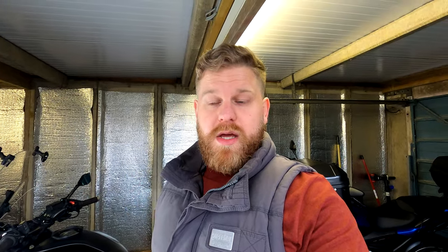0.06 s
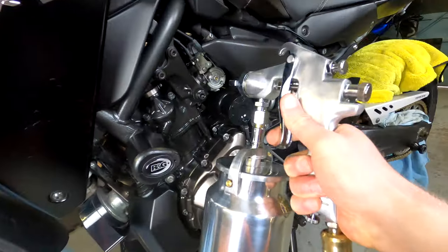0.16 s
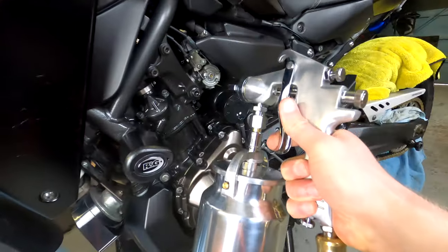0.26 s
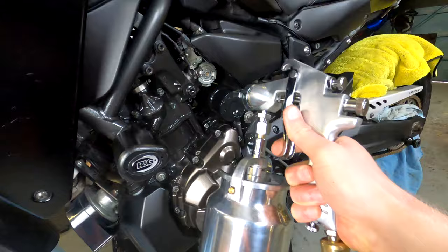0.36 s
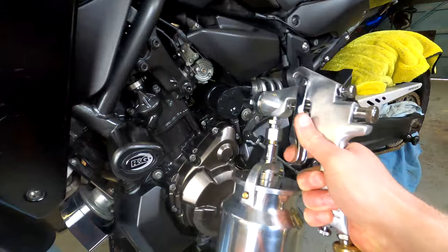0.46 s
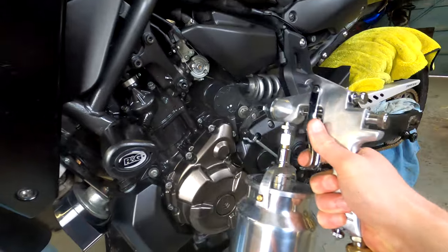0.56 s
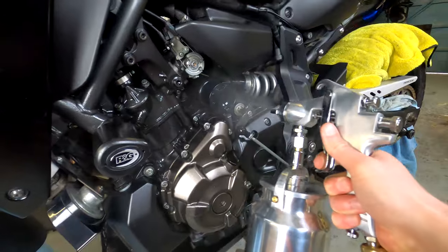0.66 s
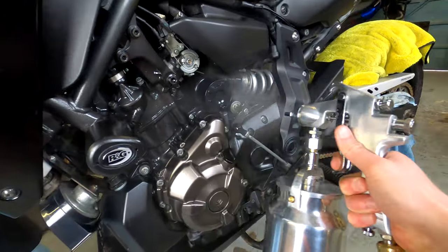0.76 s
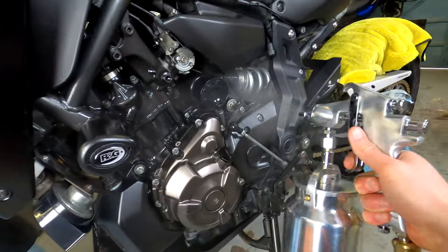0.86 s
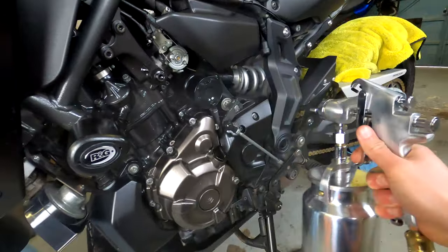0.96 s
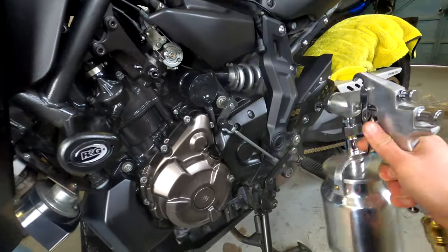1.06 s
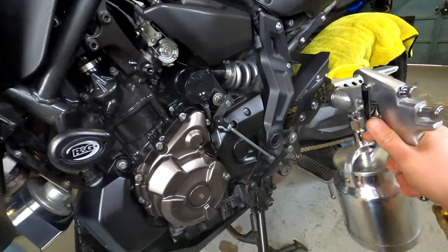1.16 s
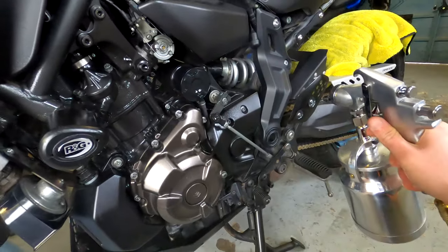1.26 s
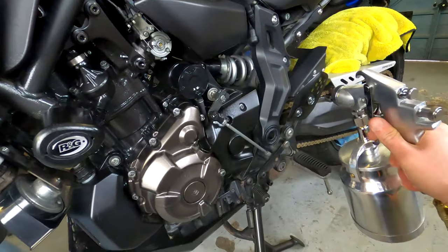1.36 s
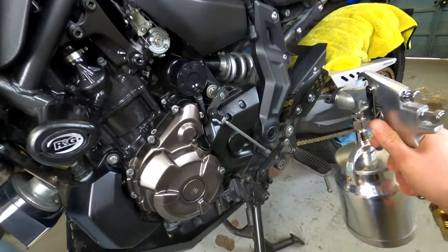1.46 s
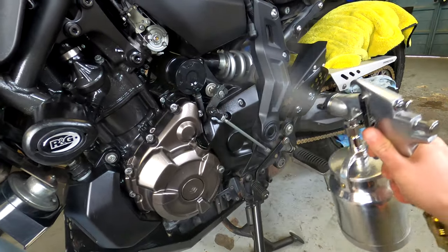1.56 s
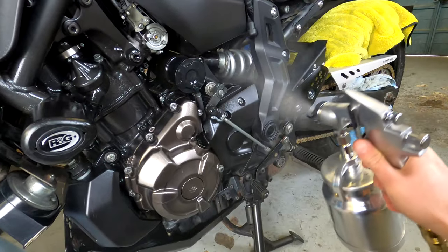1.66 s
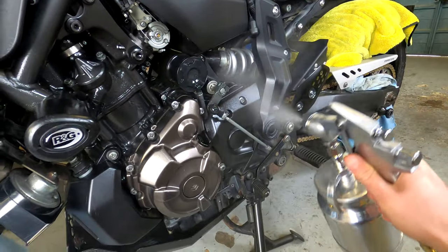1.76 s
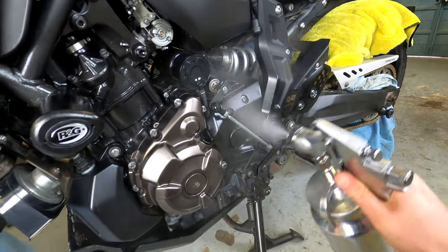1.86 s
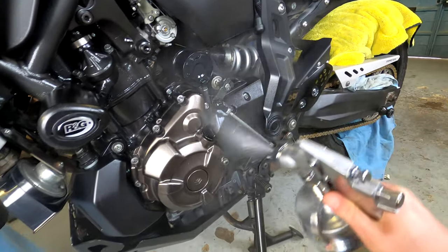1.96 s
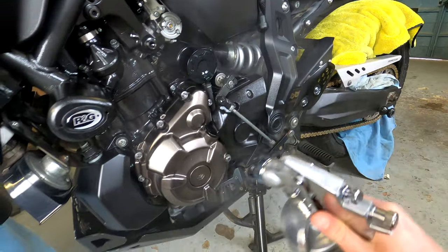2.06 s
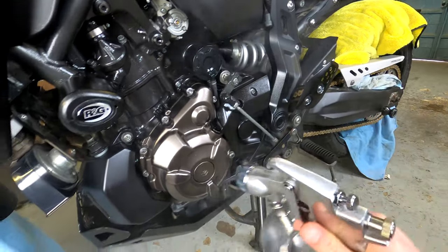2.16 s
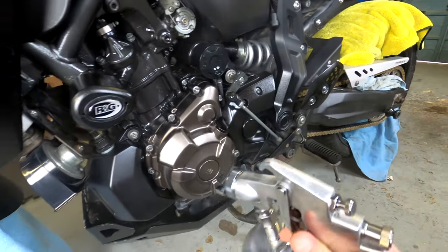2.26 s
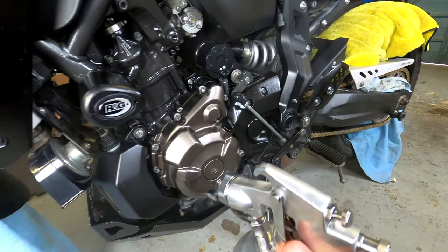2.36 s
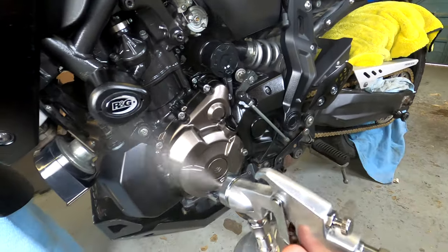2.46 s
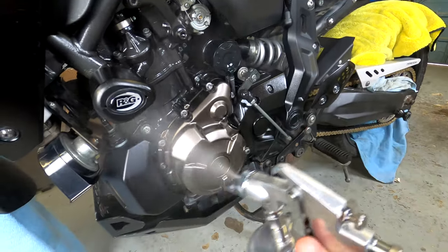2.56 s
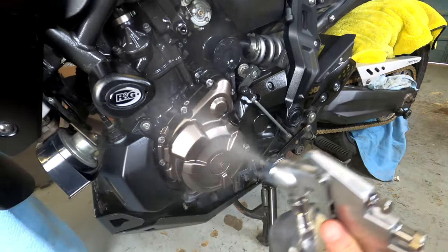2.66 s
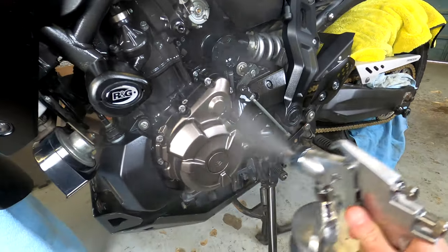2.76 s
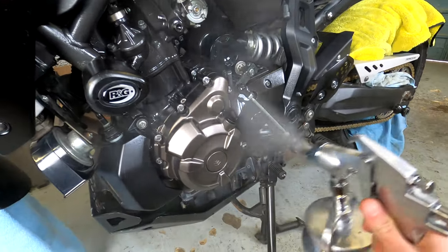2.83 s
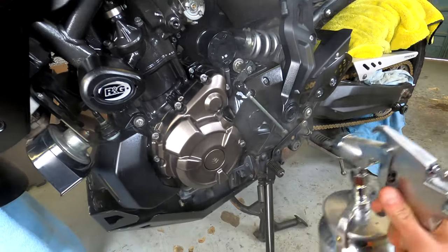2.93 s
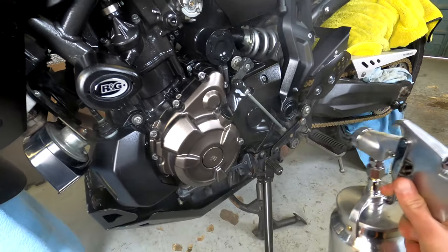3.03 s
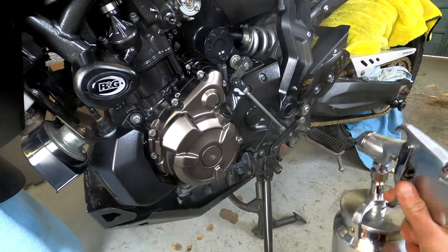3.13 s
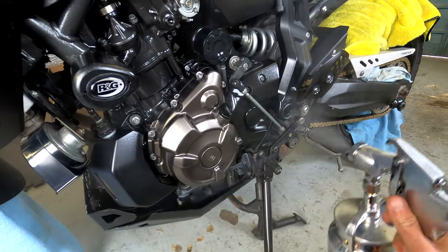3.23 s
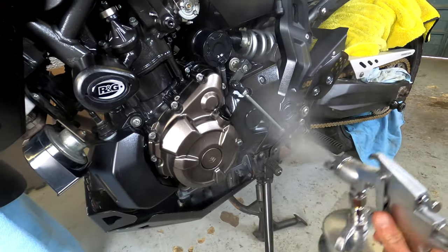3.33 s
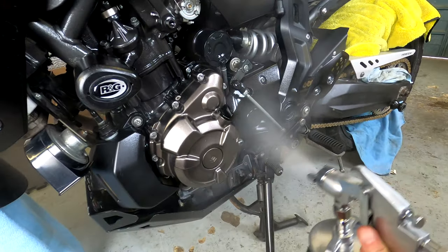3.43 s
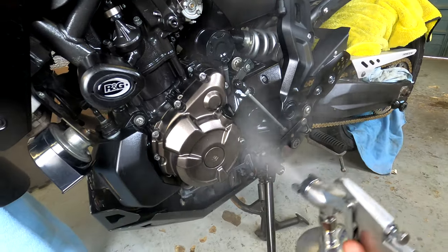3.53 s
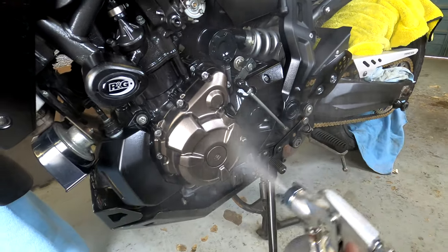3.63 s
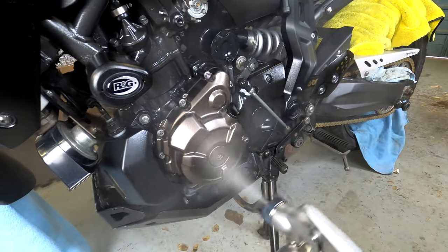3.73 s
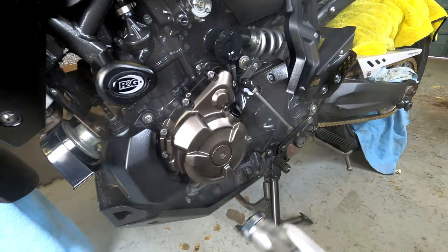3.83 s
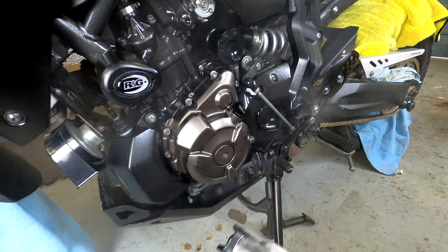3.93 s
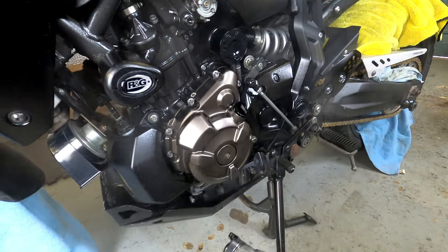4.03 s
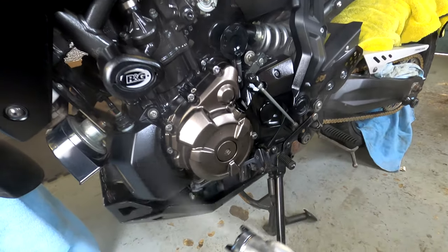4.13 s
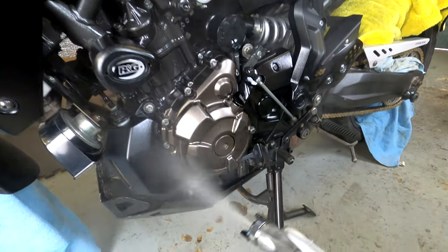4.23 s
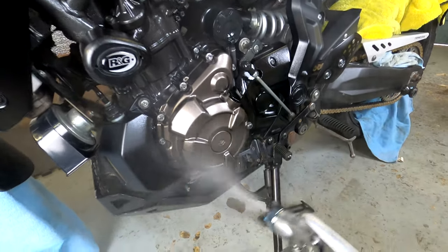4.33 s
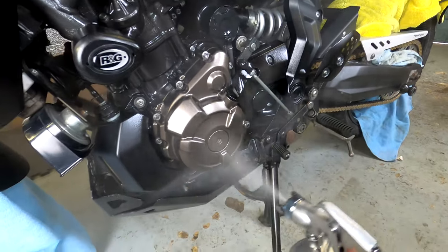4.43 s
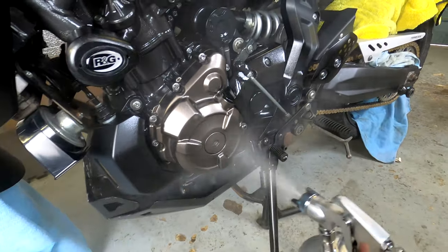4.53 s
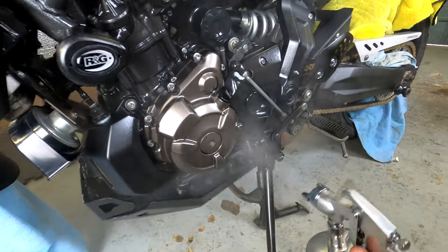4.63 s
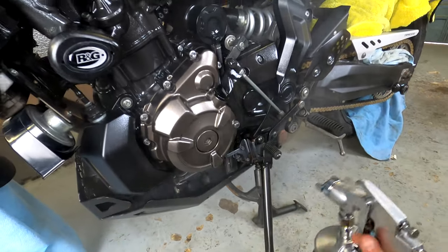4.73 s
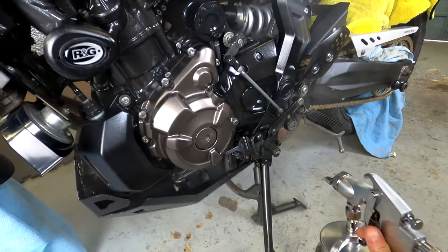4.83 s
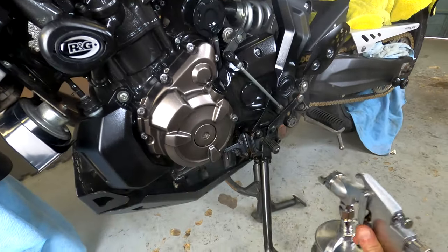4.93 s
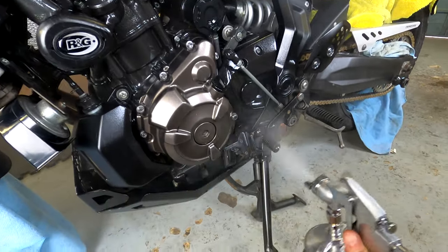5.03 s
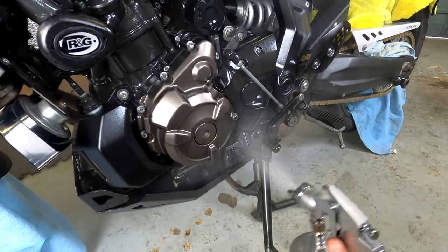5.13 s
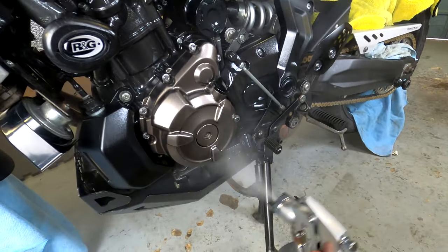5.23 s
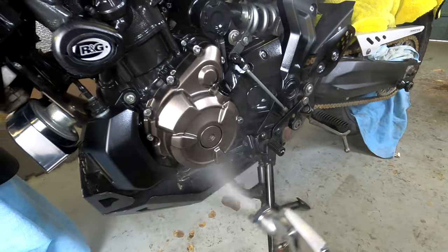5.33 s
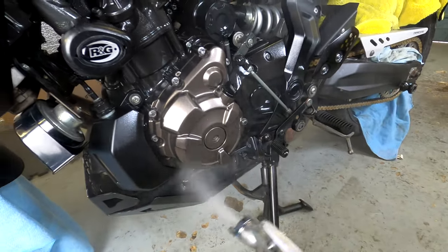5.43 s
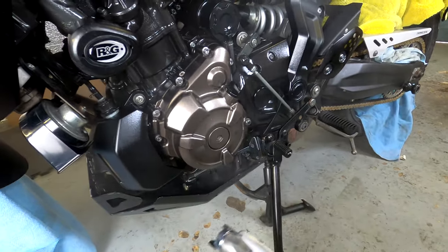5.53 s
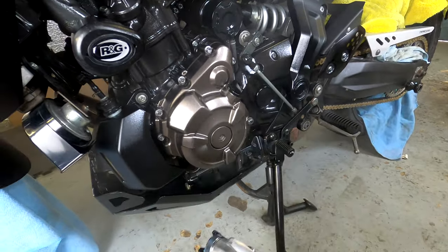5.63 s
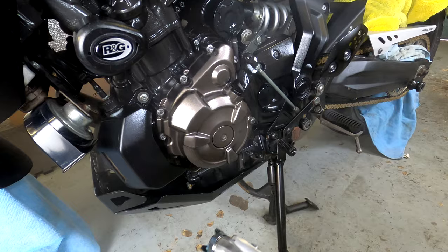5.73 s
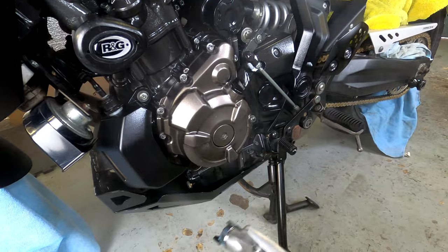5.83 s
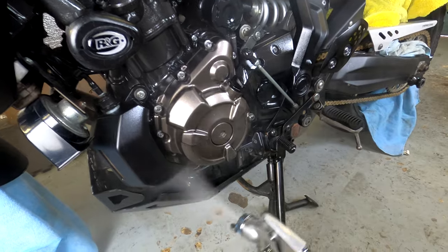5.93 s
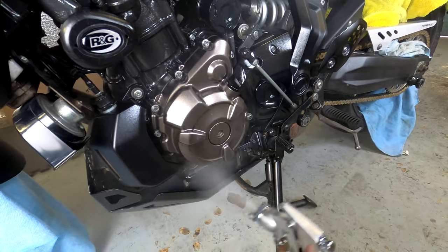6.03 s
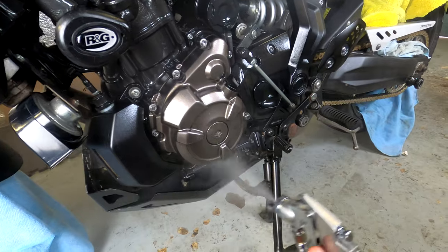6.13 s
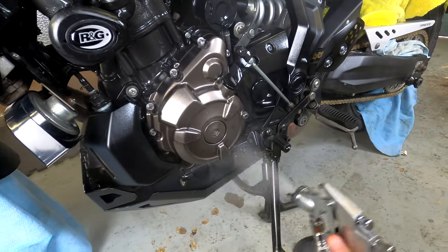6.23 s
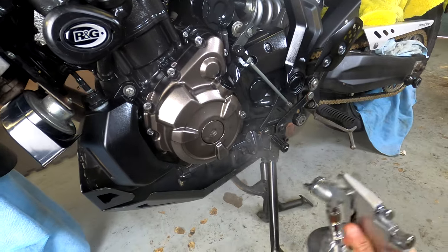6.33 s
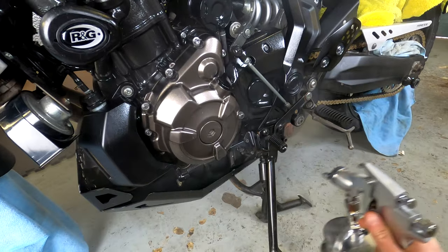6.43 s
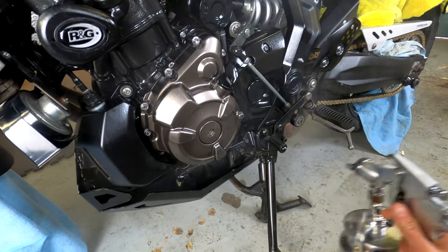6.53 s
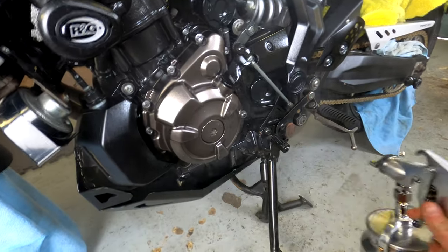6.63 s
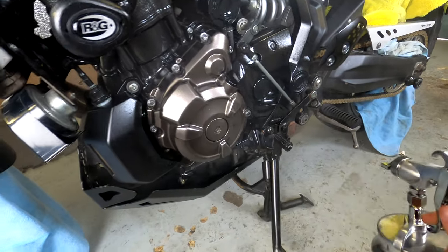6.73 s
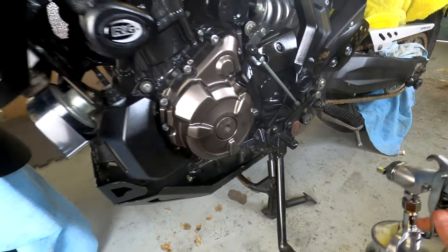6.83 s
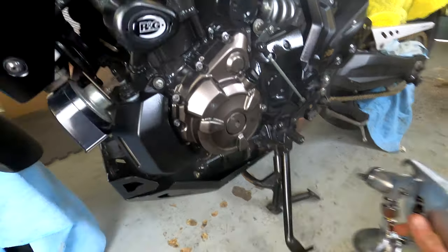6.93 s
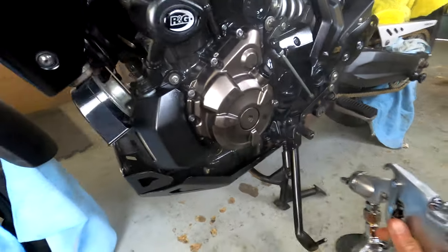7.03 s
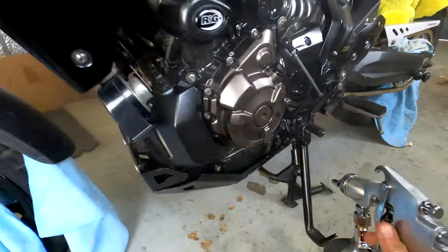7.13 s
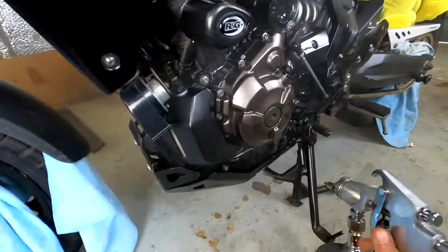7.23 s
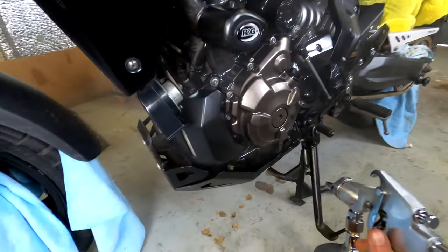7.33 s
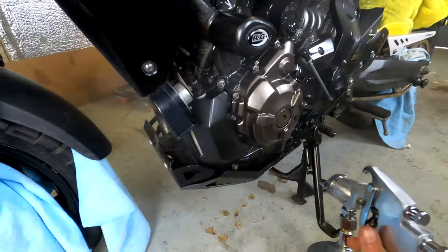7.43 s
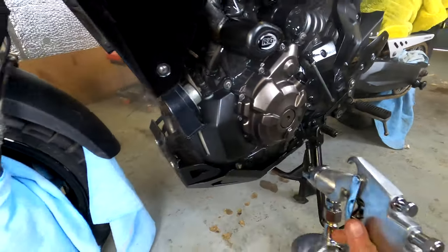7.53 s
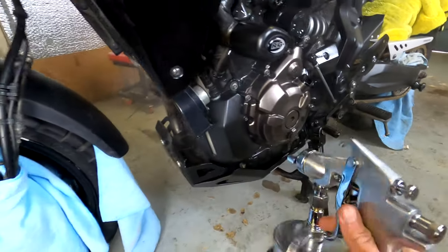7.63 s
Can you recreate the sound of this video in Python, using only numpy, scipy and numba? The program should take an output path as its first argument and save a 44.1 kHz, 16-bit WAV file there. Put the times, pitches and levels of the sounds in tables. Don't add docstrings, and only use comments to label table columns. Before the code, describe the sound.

A close stereo microphone in a small, briefly ringing garage. Quiet air and a faint low draught open the scene, then a spray gun hisses from 0.3 to 1.2 seconds, the longest and loudest burst. Six more follow at about 1.5-2.3, 2.5-3.1, 3.3-4.0, 4.2-4.8, 5.0-5.6 and 5.9-6.5, the last weakest. Each starts crisp and bright, drains to a fuller wavering rush around the mid-treble, often thins brighter at the end, and stops with a soft low thump. A faint high leak whistle fades in the gaps; small parts tick at 1.45, 2.45 and 3.2. Far off, traffic rumbles and a car faintly revs from 4.1 to 5.0. After 6.55 cloth rubs softly, a shoe shudders and scrapes on grit at 6.8-7.1, low muffled steps stir, and tiny ticks sound at 7.3-7.6.

```python
import sys
import numpy as np
from scipy import signal
from scipy.fft import rfft, irfft, next_fast_len
from scipy.io import wavfile
from scipy.ndimage import uniform_filter1d
from numba import njit

SR = 44100
rng = np.random.default_rng(int(sys.argv[2]) if len(sys.argv) > 2 else 0)


def makeup_ratio(level_db):
    decades = np.asarray(level_db, float) / 20
    return 10 ** decades


def generate_wav(signal):
    frames = np.transpose(np.atleast_2d(signal))
    scaled = np.clip(frames, -1, 1) * 32767
    pcm = np.round(scaled).astype(np.int16)
    wavfile.write(sys.argv[1], SR, pcm)


N = 338952
TIME = np.arange(N) / SR
SIZE = next_fast_len(N + SR // 2)
HZ = np.maximum(np.arange(SIZE // 2 + 1) * SR / SIZE, 1)
STRIDE = 16

# open_s, shut_s, thump_db
TRIGGER = [
    (.279, 1.1694, -25),
    (1.531, 2.2717, -25),
    (2.488, 3.1126, -28),
    (3.284, 4.0268, -24),
    (4.184, 4.8347, -25),
    (5.033, 5.6457, -26),
    (5.882, 6.5478, -28),
]
# level_db, nozzle_facing_db, hose_surplus_share, air_alone_s, air_alone_share
BURSTS = [
    (-28.5, 3.5, 0.83, .05, 0.2),
    (-29, .5, 1.1, 0.19, 0.65),
    (-30, -1.5, 1.08, 0.096, 1.2),
    (-29.5, -.5, 0.83, 0.11, 1.24),
    (-30, -0.5, 0.98, 0.069, 0.75),
    (-30.5, -1, 0.9, 0.12, 1.4),
    (-32, -0.5, 1.21, 0.066, 0.93),
]
# time_s, nearness_to_metal_db, cavity_hz
SWEEP = [(.3, -2.5, 3600), (.46, -5, 3600), (.6, -3.5, 3360), (.82, -2.5, 3360), (1.12, -3.5, 3160),
         (1.72, -2.5, 3820), (1.92, -1, 3680), (2.0, 1.5, 3620), (2.64, 1.5, 3770), (3.05, -0.5, 3580),
         (3.55, -1.5, 3800), (3.91, 4.5, 3570), (4.2, 0.5, 3450), (4.33, 1.5, 3470), (5.3, 0.5, 3550),
         (5.55, 4, 3700), (6.1, 2.5, 3400), (6.36, 3, 4400)]
# pitch_hz, density_db_per_hz
JET_COLOUR = [(120, -48.5), (200, -21.5), (463, -17.5), (654, -13.5), (1570, -7.5), (3630, 0.5),
              (6050, -3.5), (7120, -8), (8710, -8), (12300, -15), (15600, -25.5)]
# centre_hz, usual_level_against_body_db
ZONES = [(1100, -10.5), (3700, 0), (7800, -4), (12500, -12.5)]
# pitch_hz, width_hz, level_db
AIR_CAP = [(1060, 134, 2.5), (3700, 450, -1.8), (4840, 980, -0.5), (6500, 950, 2.5), (10800, 2000, -2.5),
           (12230, 700, 2)]
# pitch_hz, density_db_per_hz
DRAG_COLOUR = [(290, -15), (500, -13), (855, -19), (933, -12.5), (1400, -4.5), (2130, -2.5), (5880, -11),
               (6420, -11.5), (12300, -35), (16000, -51)]
# start_s, peak_db, pitch_hz, t60_s, crack_db
TICKS = [
    (1.455, -36.5, 1070, 0.15, -4),
    (2.447, -48.5, 550, 0.3, -14),
    (3.207, -40.5, 1250, 0.1, -26),
    (7.294, -46, 1890, .035, -9),
    (7.324, -50, 1190, .03, 0),
    (7.406, -41.5, 1390, 0.018, -24),
    (7.565, -51, 1152, .04, -24),
]
# pitch_hz, t60_s
GARAGE = [(150, 0.42), (600, 0.49), (2500, 0.3), (8000, 0.25), (14000, 0.21)]
# pitch_hz, likeness_0_to_1, left_minus_right_db, left_lag_rad
PORTS = [(35, .98, .9, 0), (85, .97, .9, 0), (250, .87, .2, .1), (700, .87, -.5, .25), (1400, .9, 0, .48),
         (2800, .92, 1.6, .9), (5000, .72, .6, 1.3), (7200, .64, -2.2, 2.0), (9200, .6, -4.8, 1.0),
         (14000, .33, -8, 1.6)]
# pitch_hz, width_hz, level_db
HOUSING = [
    [(7180, 280, 5.5), (7820, 270, 3), (8650, 700, -4.5), (9880, 640, 4.5)],
    [(7700, 330, 4), (7950, 160, -3.5), (8460, 320, 0.5)],
]
# centre_s, level_db, half_length_s
PASSING = [(.3, -54, 0.066), (1.15, -59, 0.11), (1.55, -54, 0.067), (2.5, -51.5, .05), (2.96, -51, 0.044),
           (3.25, -63, .1), (4.05, -50, 0.08), (5.4, -67, .08), (5.7, -55.5, 0.12), (6.25, -54, .12),
           (6.85, -51.5, 0.19), (7.6, -54, 0.14)]
# centre_s, level_db, half_length_s
STEPS = [
    (2.08, -56, 0.066),
    (4.9, -50.5, 0.14),
    (5.8, -49, 0.095),
    (6.25, -57, 0.19),
    (6.72, -51, 0.13),
    (6.93, -51, 0.12),
    (7.41, -47.5, 0.12),
    (7.6, -47.5, .08),
]
# walls_db, draught_db
KICKS = [
    (-55.5, -36),
    (-45, -39.5),
    (-55, -42.5),
    (-54, -50),
    (-45, -48),
    (-40, -44.5),
    (-39, -40.5),
]
# time_s, firing_hz, level_db
CAR = [
    (4.12, 54.4, -58),
    (4.21, 54.6, -62),
    (4.32, 55, -50),
    (4.43, 59, -50),
    (4.55, 60.7, -47),
    (4.76, 62.2, -47),
    (4.98, 60.4, -51),
    (5.04, 62.1, -55),
]
# pitch_hz, density_db_per_hz
FLOOR = [(210, -28.5), (350, -6.5), (490, -10.5), (790, -17), (1160, -14), (3000, -23), (6000, -29),
         (12000, -41), (13500, -62)]
# centre_s, level_db, half_length_s
CLOTH = [
    (6.62, -1, .06),
    (7.3, -2, .025),
    (7.4, -3, .03),
    (7.57, -6, .015),
]
# pitch_hz, width_hz, level_db
LEAK = [
    (6500, 330, 2.5),
    (10200, 400, -15),
    (13060, 400, -22),
    (8000, 8000, -17),
]


def jet(mic, patchy_db=0.47, flicker_db=1.44, sputter_db=0.5, walls_db=-10, first_echo_s=0.0067):
    slow = TIME[::STRIDE]
    db, splash, treble, top, cavity_hz = spray(slow)
    colour = along(JET_COLOUR) + sum(g * bell(f, w) for f, w, g in AIR_CAP)
    spectrum = hiss(makeup_ratio(colour), mic).astype(np.complex64)
    zones = [splash - ZONES[0][1], 0, treble - ZONES[2][1], top - ZONES[3][1]]
    opening = valve()[::STRIDE]
    db = 1.5 + db + sputter_db * walk(400, STRIDE) + .5 * walk(60, STRIDE)
    out, shared, octave = np.zeros((2, N)), walk(2.6, STRIDE), np.log2(cavity_hz)
    for hz, weight in slices(200, 19000, step=.25):
        gain = 0
        for k, zone in enumerate(zones):
            share = along([(f, 1. * (j == k)) for j, (f, _) in enumerate(ZONES)], hz=hz)
            gain = gain + share * zone
        shared = 0.5 * shared + 1.14 * walk(4.01, STRIDE)
        gain = gain + patchy_db * shared + flicker_db * walk(18, STRIDE)
        gain = gain - 0.27 * np.exp(-.5 * ((np.log2(hz) - octave) / 0.45) ** 2)
        curve = along([(1000, 0.39), (12000, 1.3)], hz=hz)
        power = (opening ** curve * makeup_ratio(db + gain)) ** 2
        keep = makeup_ratio(-120 * STRIDE / along(GARAGE, hz=hz) / SR)
        walls = signal.lfilter([1 - keep], [1, -keep], power)
        walls = np.roll(walls, int(first_echo_s * SR / STRIDE))
        level = np.interp(TIME, slow, np.sqrt(power + makeup_ratio(2 * walls_db) * walls))
        out += level * irfft(spectrum * weight, SIZE)[:, :N]
    cavity = resonance(out, np.interp(TIME, slow, cavity_hz), 425., 1. * SR)
    out += makeup_ratio(-7.5) * cavity
    whistle_level = np.interp(TIME, slow, makeup_ratio(-8.5 + 0.64 * (treble - ZONES[2][1])))
    whistle = resonance(out - makeup_ratio(-7.5) * cavity, np.full(N, 8520.), 560., 1. * SR)
    out += whistle_level * whistle
    pan_db = -.3 + .4 * walk(1.7)
    return out * makeup_ratio(np.array([pan_db, -pan_db]) / 2)


def spray(slow, surplus_hold_s=0.044, surplus_drain_s=0.1, facing_share=0.81):
    surplus_db = (2.5, -1.5, 8.5, 9)
    air_alone_db = (-2.5, 1, 5, 4.5)
    steady_db = (-12, -4.5, -13)
    nearness_share = (-0.49, -0.3, -0.33)
    opens, shuts, _ = np.transpose(TRIGGER)
    k = np.maximum(np.searchsorted(opens, slow) - 1, 0)
    level, facing, full, alone_s, thin = np.transpose(BURSTS)[:, k]
    surplus = full * np.exp(-np.maximum(slow - opens[k] - surplus_hold_s, 0) / surplus_drain_s)
    alone = thin * np.clip(1.5 - (shuts[k] - slow) / alone_s, 0, 1)
    s, near, cavity_hz = np.transpose(SWEEP)
    near = np.interp(slow, s, near)
    stage = [a * surplus + b * alone for a, b in zip(surplus_db, air_alone_db)]
    splash, treble, top = (d + g + n * near for d, g, n in zip(steady_db, stage[1:], nearness_share))
    cavity_hz = np.interp(slow, s, cavity_hz)
    return level + near + stage[0], splash, treble + facing, top + facing_share * facing, cavity_hz


def valve(rise_s=0.017, curve=2.3, fall_s=0.027, after_s=0.0079):
    flow = np.zeros(N)
    for opens, shuts, _ in TRIGGER:
        up = np.clip((TIME - opens) / rise_s, 0, 1) ** curve
        flow += up * np.clip((shuts + after_s - TIME) / fall_s, 0, 1)
    return flow


def thumps(push_s=.00075, hose_hz=100, hose_t60=.05, back=.2):
    out = np.zeros(N)
    for _, shuts, db in TRIGGER:
        t = TIME - shuts
        push = np.exp(-.5 * (t / push_s) ** 2) - .4 * np.exp(-.5 * (t / (2.6 * push_s)) ** 2)
        late = np.maximum(t, 0)
        swing = np.sin(2 * np.pi * hose_hz * late) * makeup_ratio(-60 * late / hose_t60)
        out += makeup_ratio(db + 3.5) * (push - back * swing)
    return np.array([out, out])


def drag(mic, left_db=3, grit_db=1.0):
    scrape = envelope((6.795, 6.806, 6.95, 7.065, 7.12), (-51, -43.5, -46.5, -45, -70))
    shudder = envelope((6.806, 6.822, 6.89, 6.93), (-78, -39, -46, -65))
    grit = noise(makeup_ratio(along(DRAG_COLOUR)), mic) * makeup_ratio(grit_db * walk(250))
    sole = np.sqrt(2) * np.sin(2 * np.pi * np.cumsum(297 + 12 * walk(40)) / SR)
    pan = makeup_ratio(np.array([[left_db], [-left_db]]) / 2)
    return scrape * grit * pan + makeup_ratio(-3.0 + 2.9 * walk(45)) * shudder * sole


def ticks(pan_db=5.5):
    out, t = np.zeros((2, N)), TIME[:SR // 8]
    pan = np.array([[pan_db], [-pan_db]]) / 2
    for s, db, hz, t60, crack_db in TICKS:
        i = int(s * SR)
        raw = rng.standard_normal((2, len(t)))
        ring = signal.lfilter(*signal.butter(2, [hz / 1.3, hz * 3.2], "band", fs=SR), raw[0])
        crack = signal.lfilter(*signal.butter(2, [2500, 7000], "band", fs=SR), raw[1])
        tone = 1.4 * np.sin(2 * np.pi * hz * t) * makeup_ratio(-60 * t / .07)
        fall = makeup_ratio(-60 * t / t60) + 0.38 * makeup_ratio(-60 * t / 0.014)
        hit = (unit(ring) + tone) * fall * np.minimum(t / 0.0017, 1)
        hit = hit + makeup_ratio(crack_db - 6.0) * unit(crack) * makeup_ratio(-60 * t / 0.024)
        out[:, i:i + len(t)] += (hit * makeup_ratio(db - 8.5 + pan))[:, :N - i]
    return out


def rustle(mic):
    rub = envelope((6.57, 6.6, 6.68, 6.8), (-56, -50.5, -52.5, -61))
    return makeup_ratio(-3.0) * rub * noise(bell(776, 530) ** 2, mic)


def garage(dry, mic, level_db=-9):
    t = TIME[:SR // 2]
    answer, spectrum = 0, hiss(1, mic)
    for hz, weight in slices(40, 90000, step=2):
        t60 = along(GARAGE, hz=hz)
        answer = answer + irfft(spectrum * weight, SIZE)[:, :len(t)] * makeup_ratio(-60 * t / t60) / np.sqrt(t60)
    answer = answer * np.clip((t - .004) / .006, 0, 1)
    answer = answer / np.sqrt(np.sum(answer ** 2) / 2)
    return makeup_ratio(level_db) * irfft(rfft(answer, SIZE) * rfft(dry.mean(0), SIZE), SIZE)[:, :N]


def rumble(mic):
    early = np.clip((0.14 - TIME) / 0.011, 0, 1) ** 2
    early_power = [makeup_ratio(2 * db) * early for db in (-69, -52.5, -46.5)]
    traffic = makeup_ratio(2 * -67 + 4 * walk(4.96)) + swells(PASSING) + early_power[0]
    hum = makeup_ratio(2 * -60 + 2.3 * walk(5.7)) + swells(STEPS) + early_power[1]
    stirred = makeup_ratio(2 * -56.5 + 4 * walk(3)) * valve()
    moving = makeup_ratio(2 * -58.5) * (TIME > 6.55)
    draught = makeup_ratio(2 * -62) + stirred + early_power[2] + moving
    for (opens, shuts, _), (hum_db, draught_db) in zip(TRIGGER, KICKS):
        kick = decay(TIME - opens, fall_s=0.065, rise_s=0.059)
        hum = hum + makeup_ratio(2 * hum_db) * kick + makeup_ratio(2 * -49.5) * decay(TIME - shuts, fall_s=0.12)
        draught = draught + makeup_ratio(2 * draught_db) * kick + makeup_ratio(2 * -43.5) * decay(TIME - shuts, fall_s=0.041)
    traffic_shape = bell(63, 6) + 0.14 * bell(35, 30)
    hum_shape = bell(88.5, 21) + 0.35 * bell(123, 35)
    draught_shape = bell(181, 160) + 0.9 * bell(267, 100) * bell(460, 330)
    out = car()
    for power, shape in ((traffic, traffic_shape), (hum, hum_shape), (draught, draught_shape)):
        out = out + np.sqrt(power) * makeup_ratio(1.0 * walk(25)) * noise(shape, mic)
    return out


def car():
    when, hz, db = np.transpose(CAR)
    level = np.sqrt(2) * envelope(when, db) * makeup_ratio(1.2 * walk(12))
    return level * np.sin(2 * np.pi * np.cumsum(np.interp(TIME, when, hz)) / SR)


def background(mic, moving_from_s=6.55):
    stir_db = -16 + 1.6 * np.minimum(TIME, moving_from_s) + 2.5 * (TIME > moving_from_s)
    air = noise(makeup_ratio(along(FLOOR)), mic) * makeup_ratio(-60.5 + 1.1 * walk(17))
    air = air * np.sqrt(makeup_ratio(2 * stir_db) + swells(CLOTH))
    shuts = np.array(TRIGGER)[:, 1]
    since = TIME - shuts[np.maximum(np.searchsorted(shuts, TIME) - 1, 0)]
    leak = noise(sum(makeup_ratio(db) * bell(hz, width) for hz, width, db in LEAK), mic)
    leak_t60 = 2.0
    return air + leak * (since > 0) * makeup_ratio(-65 - 60 * since / leak_t60 + 2.5 * walk(30))


def ports():
    like, tilt = np.clip(along(PORTS), 0, 1), along(PORTS, column=2) / 2
    left_db, right_db = (sum(g * bell(f, w) for f, w, g in port) for port in HOUSING)
    left = makeup_ratio(tilt + left_db) * np.exp(-1j * along(PORTS, column=3))
    right = makeup_ratio(-tilt + right_db)
    return np.sqrt((1 + like) / 2) * np.array([left, right]), np.sqrt((1 - like) / 2) * np.array([left, -right])


def hiss(shape, mic):
    same, other = rfft(rng.standard_normal((2, SIZE)))
    pair = shape * (mic[0] * same + mic[1] * other)
    return pair * SIZE / np.sqrt(2 * np.sum(np.abs(pair.mean(0)) ** 2))


def noise(shape, mic):
    return irfft(hiss(shape, mic), SIZE)[:, :N]


def slices(lo, hi, step):
    octaves = np.log2(HZ)
    for hz in lo * 2 ** np.arange(0, np.log2(hi / lo), step):
        away = octaves - np.log2(hz)
        near, weight = np.abs(away) < step, np.zeros(len(HZ), np.float32)
        weight[near] = np.cos(np.pi / 2 * away[near] / step) ** 2
        yield hz, weight


def along(table, column=1, hz=HZ):
    table = np.array(table)
    return np.interp(np.log(hz), np.log(table[:, 0]), table[:, column])


def unit(x):
    return x / np.sqrt(np.mean(x ** 2))


def bell(hz, width):
    return 1 / (1 + (2 * (HZ - hz) / width) ** 2)


def walk(rate, stride=1):
    k, count = max(int(SR / stride / rate), 1), len(TIME[::stride])
    held = np.repeat(rng.standard_normal(count // k + 1), k)
    return 1.326 * uniform_filter1d(uniform_filter1d(held, k), k)[:count]


def envelope(when_s, level_db):
    return makeup_ratio(np.interp(TIME, when_s, level_db, -150, -150))


def swells(table):
    slow = TIME[::STRIDE]
    power = sum(makeup_ratio(2 * db) * np.exp(-((slow - s) / half) ** 2) for s, db, half in table)
    return np.interp(TIME, slow, power)


def decay(since, fall_s, rise_s=0.0065):
    since = np.maximum(since, 0)
    return np.minimum(since / rise_s, 1) ** 2 * np.exp(-2 * np.maximum(since - rise_s, 0) / fall_s)


@njit
def resonance(x, hz, width, rate):
    y = np.empty_like(x)
    for c in range(len(x)):
        band, low = 0., 0.
        for i in range(len(hz)):
            g, k = np.tan(np.pi * hz[i] / rate), width / hz[i]
            v = (band + g * (x[c, i] - low)) / (1 + g * (g + k))
            band, low, y[c, i] = 2 * v - band, low + 2 * g * v, k * v
    return y


def scene():
    mic = ports()
    near = thumps() + drag(mic) + ticks() + rustle(mic)
    return jet(mic) + near + garage(near, mic) + rumble(mic) + background(mic)


def roll_off(x):
    return signal.sosfilt(signal.butter(12, 16660, fs=SR, output="sos"), x)


def record(dry):
    low_pass = np.clip((15850 - HZ) / 150, 0, 1)
    mix = irfft(rfft(dry, SIZE) * low_pass, SIZE)[:, :N]
    mix = mix * np.minimum(TIME[::-1] / .004, 1)
    return roll_off(mix)


dry = scene()
out = record(dry)
generate_wav(out)
```